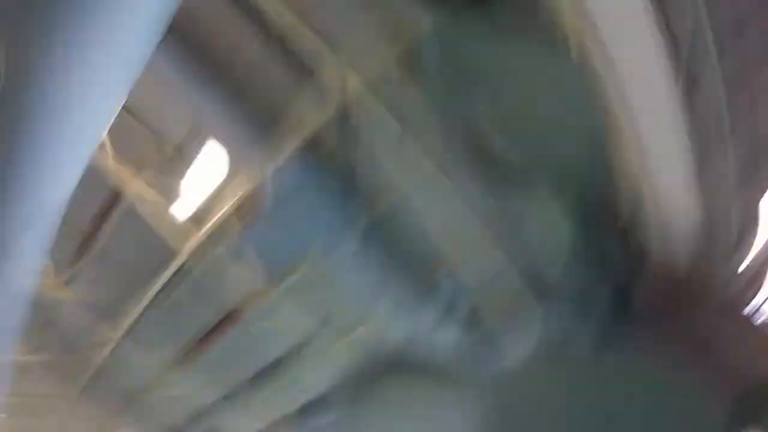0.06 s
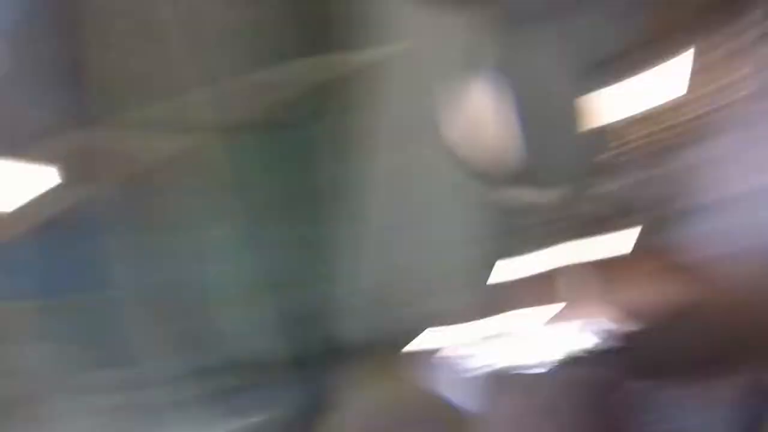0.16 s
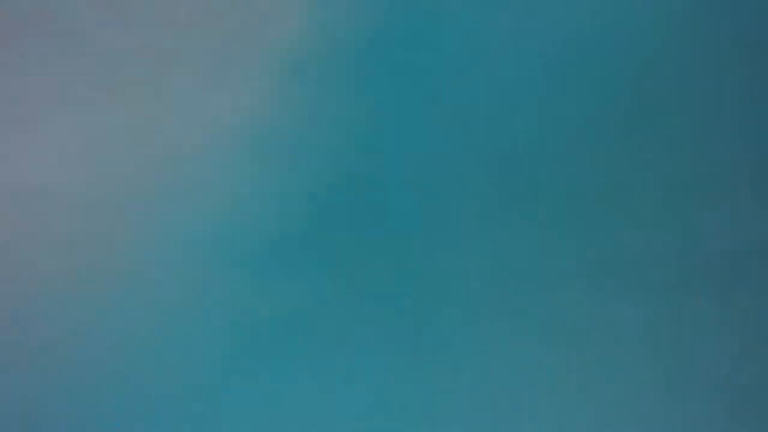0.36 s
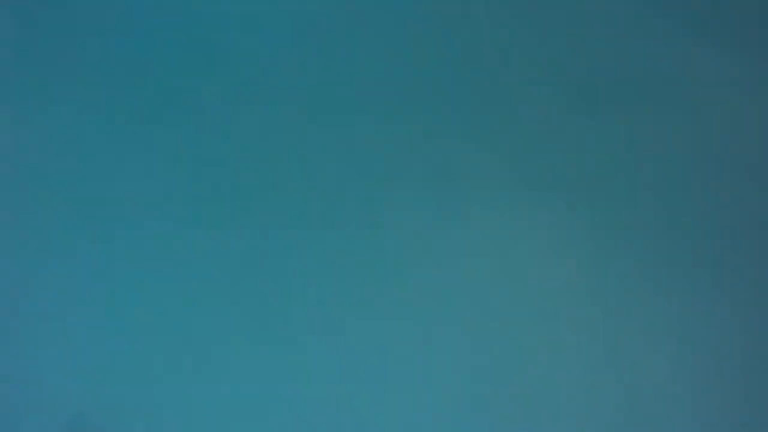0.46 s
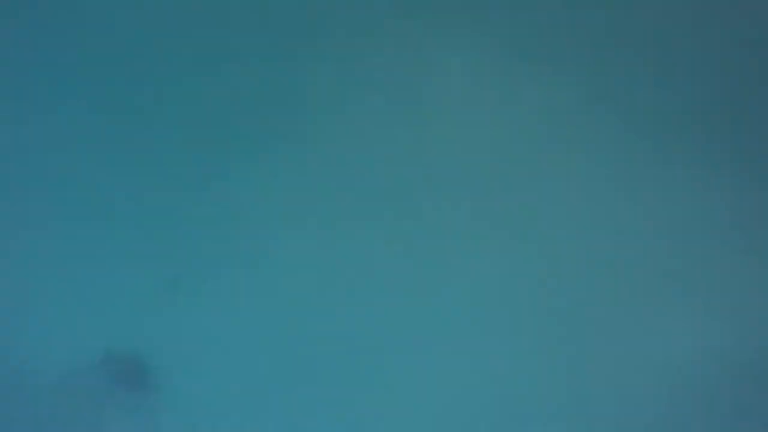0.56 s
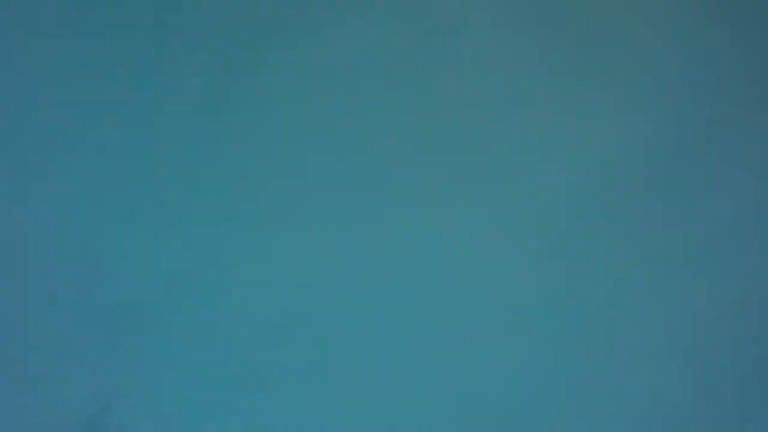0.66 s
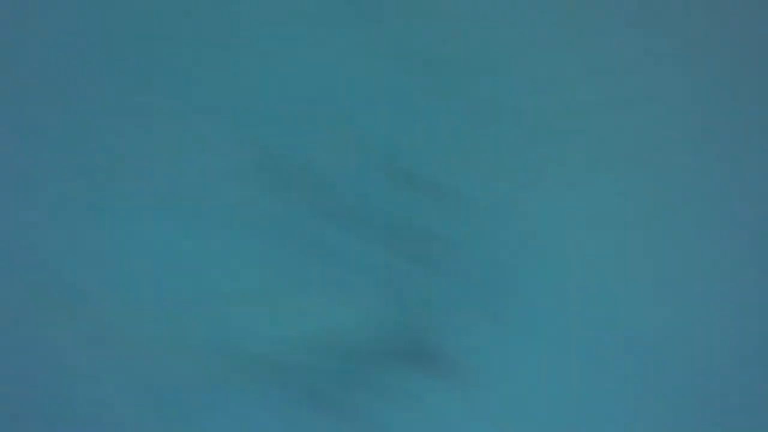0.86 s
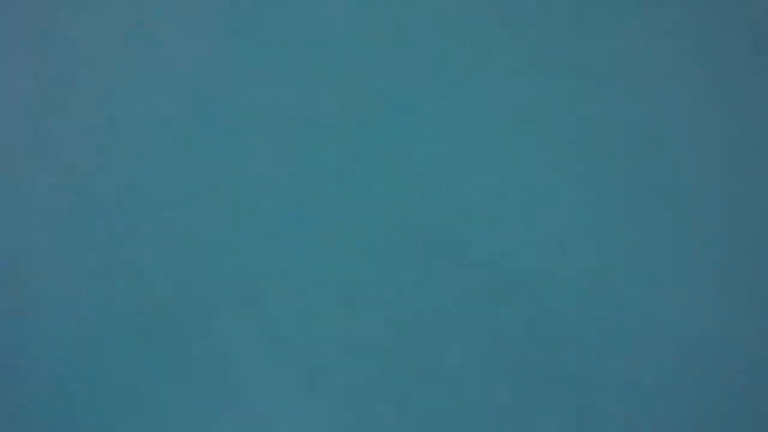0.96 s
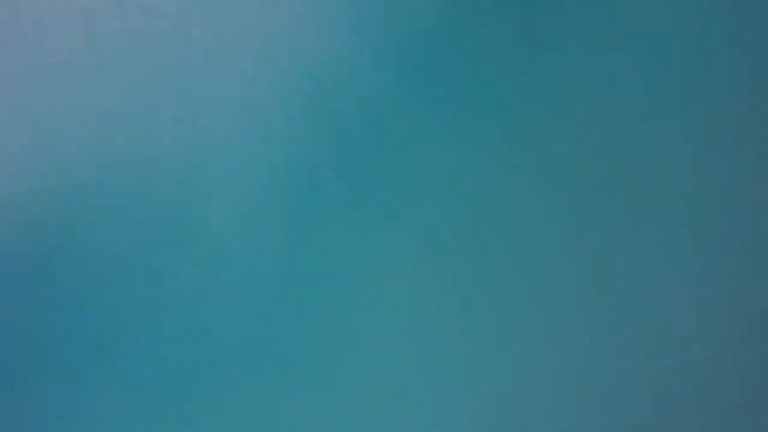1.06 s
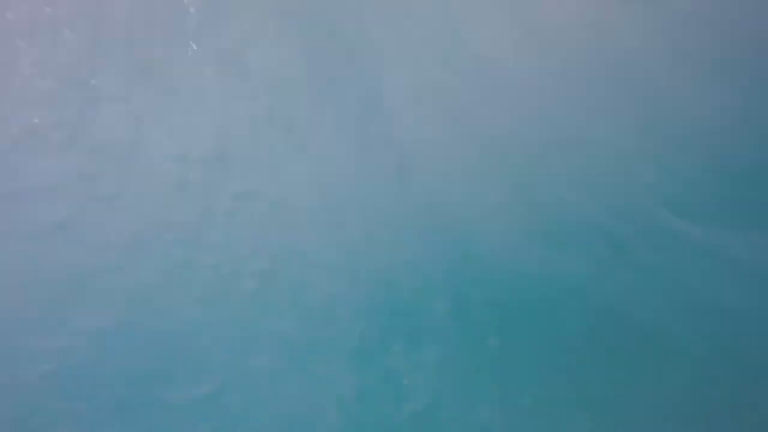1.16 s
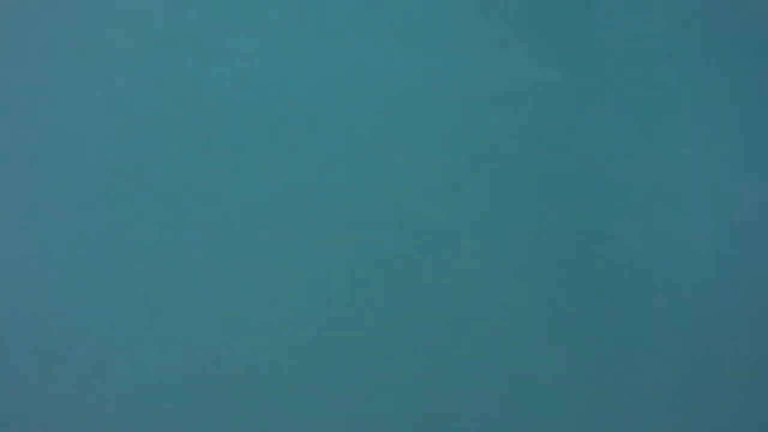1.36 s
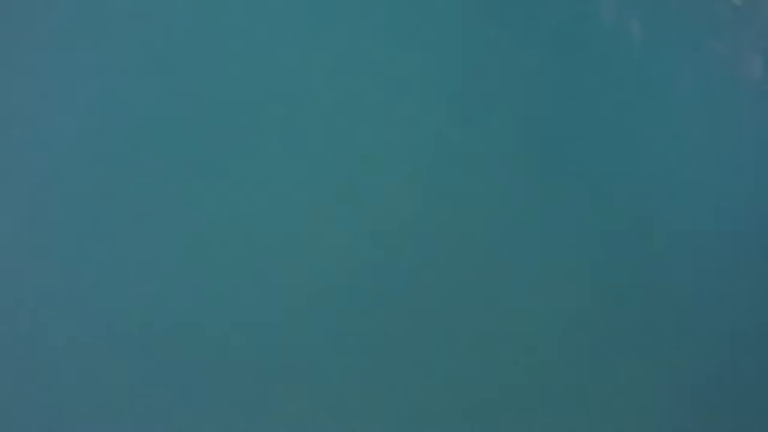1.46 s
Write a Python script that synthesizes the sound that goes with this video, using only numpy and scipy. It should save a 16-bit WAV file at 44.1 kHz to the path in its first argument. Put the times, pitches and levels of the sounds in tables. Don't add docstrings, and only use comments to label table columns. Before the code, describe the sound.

Plunge into an indoor pool heard inside a small sealed housing: faint muffled rushing water grows, a sharp ringing slap hits, then foam fizzes, large bubbles gurgle in two surges, thinning to tiny pops and clicks.

```python
import sys
import numpy as np
from scipy import signal
from scipy.io import wavfile
from scipy.ndimage import uniform_filter1d

SR = 44100
rng = np.random.default_rng(int(sys.argv[2]) if len(sys.argv) > 2 else 0)


def store_pcm(level_fs):
    pcm = np.round(np.clip(level_fs, -1, 1) * 32767).astype(np.int16)
    wavfile.write(sys.argv[1], SR, np.atleast_2d(pcm).T)


def attenuation_scalar(level_db):
    decades = np.asarray(level_db, float) / 20
    return 10 ** decades


N = 66150
T = np.arange(N) / SR
PLUNGE_S = 0.316


def rms_one(x):
    return x / np.sqrt(np.mean(x ** 2) + 1e-20)


def evened(x, seconds):
    return x / np.sqrt(uniform_filter1d(x ** 2, size=int(seconds * SR)) + 1e-20)


def in_time(rows):
    s, *columns = np.transpose(rows)
    return [np.interp(T, s, c) for c in columns]


def filtered(x, order, hz, kind="low"):
    return signal.sosfilt(signal.butter(order, hz, kind, fs=SR, output="sos"), x)


def drift(rate_hz):
    r = np.exp(-2 * np.pi * rate_hz / SR)
    return rms_one(signal.lfilter([1], [1, -2 * r, r * r], rng.standard_normal(N + SR))[SR:])


def clicks(rate_per_s, spread_db):
    sizes = attenuation_scalar(spread_db * np.minimum(rng.exponential(1, N), 4.0)) * rng.choice([-1, 1], N)
    return sizes * (rng.random(N) < rate_per_s / SR)


def ring(force, hz, t60_s):
    r, w = attenuation_scalar(-60 / (t60_s * SR)), 2 * np.pi * hz / SR
    return signal.lfilter([0, np.sin(w)], [1, -2 * r * np.cos(w), r * r], force + 1e-18)


def bubble_bank(born, pitches_hz, cycles, heights):
    dealt = rng.integers(0, len(pitches_hz), N)
    out = 0
    for k, (hz, height) in enumerate(zip(pitches_hz, heights)):
        out = out + height * ring(born * (dealt == k), hz, cycles / hz)
    return out


def lifted(x, bands):
    for hz, width_hz, lift_db in bands:
        x = x + (attenuation_scalar(lift_db) - 1) * signal.lfilter(*signal.iirpeak(hz, hz / width_hz, SR), x)
    return rms_one(x)


def coloured(x, spectrum, patchy_db):
    # centre in Hz, width in Hz, lift in dB.
    shell = [(794, 150, 5), (1440, 550, 3.5), (2400, 410, 3.5), (3120, 610, 0.5), (6500, 730, 4.5)]
    edges_hz = 200 * 2 ** np.arange(0, 6.4, 1 / 3)
    hz, db = np.transpose(spectrum)
    together = drift(45)
    out = 0
    for k, (low, high) in enumerate(zip(edges_hz, edges_hz[1:])):
        band = filtered(x[k % 2], 2, [low, high], "band")
        level_db = np.interp(np.log(low * high) / 2, np.log(hz), db)
        flicker_db = patchy_db * (0.19 * together + drift(37))
        out = out + band * attenuation_scalar(level_db + flicker_db)
    return lifted(out, shell)


def hall():
    # frequency in Hz, density in dB per Hz.
    hall_colour = [(200, -11), (700, -9.5), (1000, -12), (1400, -5), (3200, -6.5), (5000, -20),
                   (9000, -27.5), (15500, -58)]
    # centre in Hz, width in Hz, lift in dB.
    dry_shell = [(800, 70, 5), (1397, 100, 7.5), (2310, 190, 0.5)]
    start_db, rise_db_per_s = -36.5, 12.4
    top_hz, brightens_db_per_s = 2000, 17
    wash = lifted(coloured(rng.standard_normal((2, N)), hall_colour, patchy_db=0.0), dry_shell)
    body = filtered(wash, 1, top_hz)
    wash = body + (wash - body) * attenuation_scalar(brightens_db_per_s * (T - 0.12))
    return attenuation_scalar(start_db + rise_db_per_s * T) * (T < PLUNGE_S) * wash


def foam():
    # time in seconds, level in dB.
    spray = [(0.212, -40.5), (0.244, -23), (0.3, -27), (0.32, -21.5), (0.46, -26), (0.52, -30), (0.64, -26),
             (0.73, -21.5), (0.80, -28.5), (0.825, -38), (0.955, -38), (0.972, -22), (1.0, -14.5),
             (1.085, -21.5), (1.145, -24), (1.17, -30.5), (1.29, -34.5), (1.5, -44.5)]
    # frequency in Hz, density in dB per Hz.
    foam_colour = [(300, -22), (700, -4.5), (1050, -9.5), (1500, -0.5), (3000, -3.5), (5200, -21.5),
                   (8500, -24), (15500, -39)]
    grains_per_s, grain_spread_db, hiss_share = 2500, 4.5, 0.54
    dull_below_db, dull_share, dull_hz = -33.5, 0.85, 4500
    air_cut_hz = 2080
    pings_per_s, ping_cycles, ping_db = 260, 34, -14
    level_db, = in_time(spray)

    rate_per_s = grains_per_s * attenuation_scalar(4.6 * drift(89))
    grains = []
    for _ in range(2):
        bursts = rms_one(clicks(rate_per_s, grain_spread_db))
        grains.append(bursts + hiss_share * rng.standard_normal(N))
    fizz = evened(coloured(grains, foam_colour, patchy_db=2.0), seconds=0.055)

    top = filtered(fizz, 2, dull_hz, "high")
    body = filtered(fizz, 2, dull_hz)
    fizz = body - top * attenuation_scalar(dull_share * np.minimum(level_db - dull_below_db, 0))
    thin = filtered(fizz, 3, air_cut_hz, "high")

    pitches_hz = np.geomspace(1200, 11500, 24)
    born = clicks(pings_per_s, 3.2)
    pings = bubble_bank(born, pitches_hz, ping_cycles, (pitches_hz / 2500) ** -1.4)
    pings = evened(filtered(pings, 2, [900, 12000], "band"), seconds=0.11)
    return attenuation_scalar(level_db) * (np.where(T < PLUNGE_S, thin, fizz) + attenuation_scalar(ping_db) * pings)


def churn():
    # time in seconds, gurgle level in dB, turbulence level in dB.
    trapped_air = [(0, -53, -49.5), (.3, -38.5, -49), (.33, -32.5, -27.5), (.4, -27.5, -44.5),
                   (.48, -31, -32.5), (.58, -24, -29), (.68, -19, -22.5), (.76, -24, -31),
                   (.82, -28.5, -31), (.92, -35.5, -36.5), (.97, -30, -27.5), (1.03, -19, -27),
                   (1.13, -24, -34.5), (1.25, -33, -43), (1.33, -36, -60), (1.5, -39, -64)]
    # time in seconds, level in dB.
    sway_curve = [(0.0, -42), (0.054, -34.5), (0.182, -38), (0.204, -25.5), (0.438, -41.5), (0.512, -26),
                  (0.58, -57), (1.018, -29), (1.5, -48)]
    gurgles_per_s, gurgle_cycles = 980, 10.2
    gurgle_db, buffet_db = in_time(trapped_air)
    sway_db, = in_time(sway_curve)

    pitches_hz = np.geomspace(230, 880, 18)
    born = clicks(gurgles_per_s * attenuation_scalar(3 * drift(30)), 2.23)
    rings = bubble_bank(born, pitches_hz, gurgle_cycles, (pitches_hz / 500) ** 1.12)
    gurgle = evened(filtered(rings, 4, 980), seconds=0.081)
    buffet = filtered(rng.standard_normal(N + SR), 2, [73, 217], "band")[SR:]
    sway = filtered(rng.standard_normal(N + SR), 2, [14.5, 42.6], "band")[SR:]
    buffet = evened(buffet, seconds=0.029)
    sway = evened(sway, seconds=0.067)
    return attenuation_scalar(gurgle_db) * gurgle + attenuation_scalar(buffet_db) * buffet + attenuation_scalar(sway_db) * sway


def shoves():
    # time in seconds, level in dB, start in Hz, end in Hz, length in ms.
    shove_events = [
        (0.2000, -14, 170, 50, 29),
        (0.4975, -9, 52, 24, 36),
        (0.5030, -6, 170, 230, 7),
        (0.5100, -16, 230, 170, 14),
        (0.5480, -14, 110, 105, 40),
        (0.9800, -17, 115, 100, 30),
        (1.0280, -15, 150, 40, 22),
    ]
    out = np.zeros(N + 3000)
    for s, db, start_hz, end_hz, ms in shove_events:
        u = np.minimum(np.arange(3000) / SR * 1000 / ms, 1)
        turns = ms / 1000 * (start_hz * u + (end_hz - start_hz) * u ** 2 / 2)
        swell = np.abs(np.sin(np.pi * u ** 0.76))
        i = int(s * SR)
        out[i:i + 3000] -= attenuation_scalar(db) * swell * np.sin(2 * np.pi * turns)
    return out[:N]


def slaps():
    # time in seconds, level in dB, centre of force in Hz, contact in ms.
    hits = [(0.2440, -25, 2200, 9.1), (0.317, -4.5, 4500, 5.7), (0.3210, -10.5, 3270, 5),
            (0.398, -13, 2580, 3.1), (0.4858, -4.5, 1750, 1.9), (0.708, -8, 1900, 1.8),
            (0.897, -25, 3200, 14), (0.9361, -5.5, 1840, 0.91), (0.9420, -12.5, 1310, 6),
            (1.0970, -11, 2320, 2.4), (1.11, -12.5, 1520, 2), (1.3090, -13, 3060, 1.1),
            (1.3120, -12.5, 1600, 2.7), (1.3181, -14, 2140, 7.9), (1.3560, -21, 1600, 3.9),
            (1.360, -16, 2350, 1.6), (1.4023, -16.5, 2230, 4), (1.416, -18.5, 2680, 6.3),
            (1.43, -23, 2900, 5.3), (1.4400, -23, 2680, 6.7), (1.458, -28.5, 2400, 5)]
    # frequency in Hz, level in dB, t60 in seconds.
    shell_modes = [(820, 5.5, .011), (1463, 0.5, 0.017), (2100, 0, 0.012), (2607, 0.5, 0.019),
                   (3160, -1.5, 0.016), (3730, -2, 0.0038), (4970, -16, 0.0035), (6500, -7, 0.0025),
                   (8180, -10, 0.0066), (11300, -33, .003)]
    detune = 0.04
    t = np.arange(2000) / SR
    out = np.zeros(N + 2000)
    for s, db, centre_hz, ms in hits:
        rings = 0
        for hz, mode_db, t60_s in shell_modes:
            rattle = rng.standard_normal(2000) * np.exp(-t / (0.00074 * ms)) / np.sqrt(ms * 20.0)
            force = rattle + 0.27 * (t == 0)
            reach_db = mode_db - 10.0 * np.log2(hz / centre_hz) ** 2
            pitch_hz = hz * (1 + detune * rng.standard_normal())
            rings = rings + attenuation_scalar(reach_db) * ring(force, pitch_hz, t60_s)
        i = int(s * SR)
        out[i:i + 2000] += attenuation_scalar(db) * rings / np.abs(rings).max()
    return out[:N]


def bubbles():
    # time in seconds, level in dB, pitch in Hz, cycles (none for snaps).
    gulps = [(0.3130, -16.5, 160, 4.1), (0.3760, -15.5, 764, 6.8), (0.3930, -15.5, 516, 10.0),
             (0.4370, -14.5, 710, 11), (0.5610, -15, 324, 9.2), (0.5996, -12.5, 204, 8.7),
             (0.6080, -16, 106, 13), (0.6560, -14, 565, 18.0), (0.6600, -13.5, 183, 10),
             (0.6809, -9.5, 684, 14), (0.7120, -14, 658, 14.0), (0.7186, -15, 936, 14.0),
             (0.7360, -12.5, 710, 10.0), (0.7999, -12, 234, 6.1), (0.9015, -17.5, 107, 4.6),
             (0.9276, -17.5, 137, 5.6), (0.9340, -14, 780, 6.2), (0.9960, -12, 690, 13),
             (1.0110, -8.5, 786, 20), (1.0180, -13.5, 312, 8.4), (1.0420, -11, 563, 10.0),
             (1.0620, -8, 517, 8.5), (1.0680, -11.5, 355, 8.0), (1.1975, -18, 355, 11),
             (1.2382, -19.5, 334, 15), (1.2600, -25, 750, 10.0), (1.3400, -25, 566, 10.0),
             (1.4400, -29, 290, 12.0)]
    pocket = [
        (0.3165, 2, 3020, 28),
        (0.3167, -0.5, 3760, 21),
        (0.3166, -11, 6100, 18),
        (0.3215, 0.5, 2850, 11),
    ]
    pops = [(0.3480, -17.5, 6000, 39), (0.4863, -9, 6500, 28), (0.5380, -20, 5000, 14),
            (0.6000, -4.5, 758, 10.5), (0.6020, -7, 495, 8.9), (0.6045, 1, 1040, 3.9),
            (0.6880, -23.5, 8440, 27), (0.7720, -17.5, 4050, 28), (0.7780, -24, 8350, 28),
            (0.7970, -21, 3980, 25), (0.8040, -23.5, 7900, 20), (0.8400, -10, 587, 9),
            (0.8410, -32, 6230, 20), (0.8610, -31, 6650, 23), (0.8720, -24.5, 3150, 18),
            (0.8760, -23.5, 1330, 15), (0.8985, -30, 7600, 18), (1.0810, -16.5, 8850, 14),
            (1.1180, -13, 537.6, 37), (1.1300, -9.5, 560, 13), (1.1580, -24, 7600, 13),
            (1.2370, -18.5, 710, 8.7), (1.3120, -26, 7000, 14), (1.312, -10.5, 1570, 16),
            (1.3171, -24, 6240, 20), (1.3610, -21.5, 382, 6.3), (1.3920, -20, 2050, 14),
            (1.4015, -22.5, 6800, 14), (1.4730, -37.5, 6200, 18),
            (0.3604, -12, 2030, 18.0), (0.3760, -13, 2720, 14.0), (0.3971, -12, 3650, 17),
              (0.4377, -12, 1800, 15), (0.5366, -14, 2871, 14.0), (0.7077, -13, 2270, 14.0),
              (0.7229, -8.5, 1693, 13.5), (0.7697, -11, 2230, 16.0), (0.7958, -16, 2124, 16.0),
              (0.9033, -22.5, 3280, 20.0), (0.9344, -12.5, 2610, 16.0), (0.9700, -10, 2727, 24.0),
              (0.9939, -12, 2070, 16.0), (1.0721, -12, 3072, 22.0), (1.1110, -12.5, 1090, 14),
              (1.1537, -11, 2870, 20), (1.4029, -22.5, 1464, 14.0)]
    snaps = [(0.8747, -34, 6339), (0.9636, -27, 9922), (1.1527, -29, 6132), (1.1735, -32, 9500),
             (1.1785, -34, 9500), (1.1825, -32, 8700), (1.2221, -26, 6063), (1.2226, -34, 7993),
             (1.2348, -33, 8682), (1.2697, -30, 9853), (1.2755, -34, 12500), (1.2852, -34, 8544),
             (1.2930, -32, 8500), (1.3174, -29, 11300), (1.3290, -39, 11800), (1.3559, -35, 8062),
             (1.3605, -28, 5030), (1.3860, -42, 8300), (1.4167, -33, 8268), (1.4221, -35, 8337),
             (1.4295, -42, 9500), (1.4575, -44, 8300), (1.4634, -61, 10542)]
    snap_cycles, pitch_rise = 19, 0.029
    ringing_snaps = [(*snap, snap_cycles) for snap in snaps]
    out = np.zeros(N + 3000)
    for s, db, hz, cycles in gulps + pocket + pops + ringing_snaps:
        turns = np.arange(3000) / SR * hz
        height = attenuation_scalar(db - 30 * turns / cycles) * (1 - np.exp(-turns / 0.44))
        risen = turns * (1 + pitch_rise * np.tanh(turns / cycles))
        i = int(s * SR)
        out[i:i + 3000] += height * np.sin(2 * np.pi * risen)
    return out[:N]


def ticks():
    ticks_per_s, tick_cycles, start_db, fall_db_per_s = 60, 30.0, -55, 9.1
    born = clicks(ticks_per_s, 3.4) * (T > PLUNGE_S)
    rings = bubble_bank(born, np.geomspace(5800, 12500, 12), tick_cycles, np.ones(12))
    rings = evened(filtered(rings, 2, 5000, "high"), seconds=0.17)
    return attenuation_scalar(start_db - fall_db_per_s * T) * rings


def scene():
    return (hall() + foam() + churn() + shoves() + slaps() + bubbles() + ticks())[None]


def low_pass(x):
    return signal.sosfilt(signal.butter(12, 15610, fs=SR, output="sos"), x)


def record(dry):
    duck_db, lead_s, cutoff_hz = -17, 0.011, 15600
    ducked = (T > PLUNGE_S - lead_s) & (T < PLUNGE_S)
    gain_db = uniform_filter1d(duck_db * ducked.astype(float), size=20)
    x = 1.5 * np.tanh(dry * attenuation_scalar(gain_db) / 1.5)
    x = np.clip(x, -0.97, 0.97)
    x = signal.sosfilt(signal.cheby2(10, 60, cutoff_hz, fs=SR, output="sos"), x)
    return low_pass(x)


dry = scene()
out = record(dry)
store_pcm(out)
```